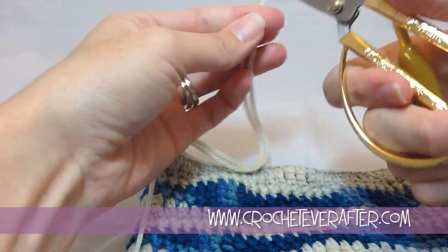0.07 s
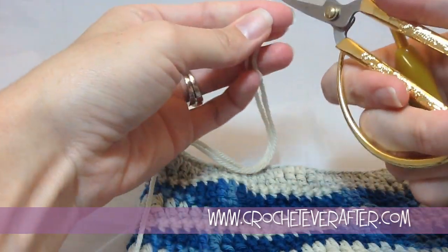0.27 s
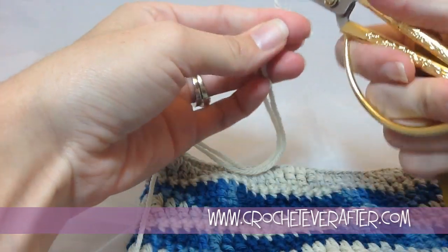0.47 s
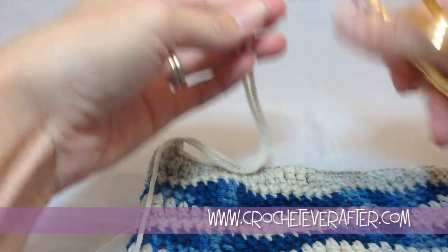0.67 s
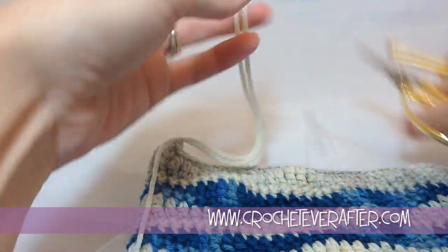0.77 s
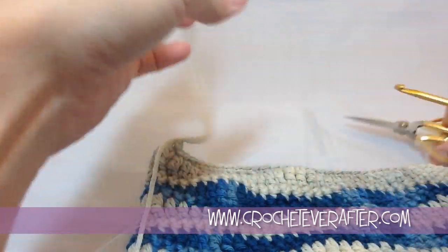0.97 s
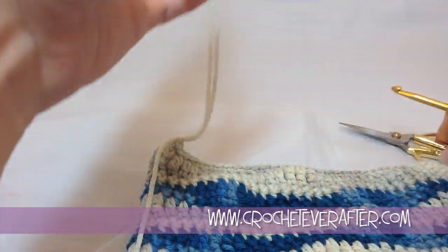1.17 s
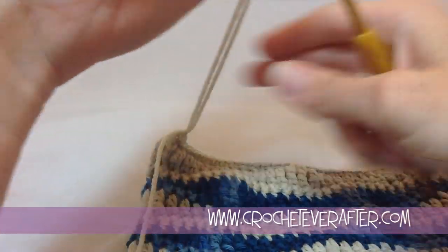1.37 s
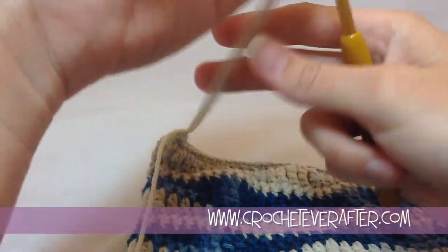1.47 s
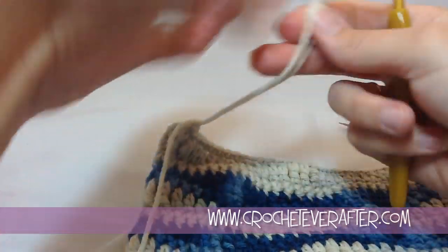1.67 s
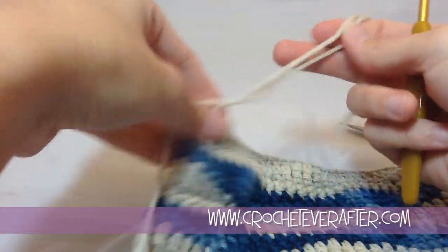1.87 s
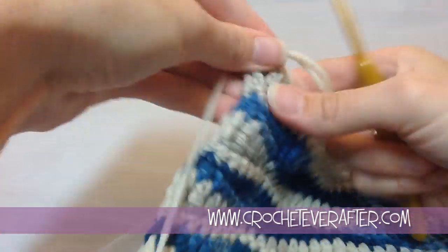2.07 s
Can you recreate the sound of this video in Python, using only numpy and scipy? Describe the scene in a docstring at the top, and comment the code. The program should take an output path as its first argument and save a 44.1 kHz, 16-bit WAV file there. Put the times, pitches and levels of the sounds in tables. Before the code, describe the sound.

Small steel scissors, close to the microphone in a quiet room: a barely audible click at 0.17 seconds, a clear light click at 0.39, a tiny gritty slide, then a bright, sharp snip at 0.47. A soft dull bump comes at 0.83. Scissors scrape and clatter on a hollow table at 1.0-1.2. Yarn slides faintly around 1.5 and from 1.85 to the end, over low room tone.

```python
"""Scissors snip, table knocks and yarn

Small steel scissors close near the microphone: light ringing clicks, a gritty slide of the edges, a sharp snip.
A soft bump; then the scissors drag over a hollow table and knock on it, ringing its modes with noisy clatter.
Yarn slides through fingers as dense tiny ticks, the hand rustles faintly, and a small room answers with echoes.
Coloured noise makes the low room tone and its faint hiss."""
import sys
import numpy as np
from scipy import signal
from scipy.fft import rfft, irfft
from scipy.io import wavfile

SR = 44100
rng = np.random.default_rng(int(sys.argv[2]) if len(sys.argv) > 2 else 0)


def master_out(mix):
    """Clip the mix to full scale and print it as 16-bit PCM to the path in sys.argv[1]."""
    frames = np.transpose(np.atleast_2d(mix))
    ceiling = np.clip(frames, -1, 1)
    pcm = np.round(ceiling * 32767).astype(np.int16)
    wavfile.write(sys.argv[1], SR, pcm)


def gain_from_db(level_db):
    """Turn a decibel level (scalar or array-like) into a linear amplitude factor."""
    decades = np.asarray(level_db, float) / 20
    return 10 ** decades


N = 93492

# Broad resonances of the damped blades. Each row: frequency in Hz, relative level in dB.
BLADE_MODES = [(5300, -8), (6600, -14), (7876, -27), (9400, -13), (9900, -3), (11000, 4), (11700, -15),
               (12830, -12), (13720, 14), (14440, -18)]
# Blade clicks, the last one the snip. Each row: start in seconds, crack level in dB, ring level in dB,
# tilt of the ring in dB per octave, crack tail in dB against its quick part.
BLADE_CLICKS = [(0.171, -57.5, -80, 0, -6), (.3888, -27.5, -51, -2, -10), (0.4724, -14, -31.5, 11, -7)]
# Crack colour of a light click. Each row: frequency in Hz, relative level in dB.
CLICK_COLOUR = [(880, -61.5), (1500, -39), (2120, -13), (2720, -21), (4690, -26), (6430, 2), (7540, -25.5),
                (8830, -9), (10100, -6.5), (14100, -5), (16000, -61)]
# Crack colour of the snip. Each row: frequency in Hz, relative level in dB.
SNIP_COLOUR = [(470, -61), (800, -34), (2250, -26.5), (3170, -15.5), (3500, -23.5), (3920, -12),
               (5660, -12.5), (6500, -16.5), (9730, -5.5), (12200, -16), (14600, -2.5), (16300, -32)]
# Edges sliding on each other. Each row: time in seconds, level in dB.
SLIDE_LEVEL = [(.438, -80), (.443, -58), (.448, -62), (.453, -54), (.46, -45), (.463, -49), (.466, -60),
               (.4715, -52), (.473, -120)]
# Rasp of the slide, lent to the hand's rustle too. Each row: frequency in Hz, relative level in dB.
RASP_COLOUR = [(1180, -62), (2000, -19), (3250, -2.5), (4630, -24), (6650, 6), (7220, -7), (7710, -9),
               (11400, 2), (14300, -3)]


def blades():
    """Steel clicks as noisy cracks over short rings; the slide is coloured grit."""
    t60_s = 0.006
    steel = [(hz, db, t60_s) for hz, db in BLADE_MODES]
    cracks = [(CLICK_COLOUR, 14400), (CLICK_COLOUR, 15300), (SNIP_COLOUR, 16500)]  # colour, top edge in Hz
    out = np.zeros(N)
    for (start, crack_db, ring_db, tilt, tail_db), (tone, top_hz) in zip(BLADE_CLICKS, cracks):
        out += crack(start, crack_db, tone, 0.00096, 0.0051, tail_db, top_hz)
        out += blow(start, ring_db, tilt, steel)
    slide = colour(grit(6700, 1.5), RASP_COLOUR, top_hz=14400)
    return out + curve(SLIDE_LEVEL) * slide


# Modes of the table top. Each row: frequency in Hz, relative level in dB, 60 dB decay time in seconds.
TABLE_MODES = [(115.7, -26, 0.38), (228, 4, 0.11), (336.2, -12.5, 0.31), (371.6, -4, 0.13),
               (392.7, -1.5, 0.2), (513, -4, 0.087), (612.4, -2.5, 0.12), (829, -4, 0.046),
               (965, -12, 0.15), (1091, -4, 0.076), (1532, -0.5, 0.039), (1954, -10.5, 0.14),
               (2008, -4.5, 0.035), (2580, -41, .03)]
# Knocks of the scissors on the table. Each row: start in seconds, ring level in dB, tilt in dB per octave,
# boost of the modes around 1 kHz in dB, clatter level in dB, blade jangle level in dB.
TABLE_KNOCKS = [(1.0474, -22.5, 2, -25, -30.5, -48), (1.091, -19.5, 2, 2, -18, -32),
                (1.109, -26, 0, 7.5, -23, -45), (1.144, -26.5, 2.5, -0.5, -24, -46.5),
                (1.173, -38.5, -1, -9, -67, -74)]
# The many small modes of table and handles. Each row: frequency in Hz, relative level in dB.
CLATTER_COLOUR = [(180, -15), (300, -8.5), (385, -14), (536, -21.5), (611, 2), (707, -11), (850, -6),
                  (1110, -10.5), (1370, -17), (1980, -13), (2340, -14.5), (7000, -40), (9100, -76),
                  (15400, -120)]
# Jangle of the loose blades. Each row: frequency in Hz, relative level in dB.
JANGLE_COLOUR = [(2940, -27), (5000, -21), (6830, -7), (7290, -10), (8330, 5), (11100, -9), (14300, -2),
                 (15000, -11)]
# Scissors dragged over the table. Each row: time in seconds, table rumble in dB, scrape hiss in dB.
DRAG_LEVEL = [(.885, -87, -70.5), (.897, -80, -63), (.93, -70, -63.5), (.96, -98, -61.5),
              (.975, -54.5, -60), (.997, -46.5, -54.5), (1.015, -37.5, -57), (1.035, -66, -59),
              (1.09, -60.5, -56), (1.16, -57, -63), (1.19, -120, -120)]
# Hiss of the scrape. Each row: frequency in Hz, relative level in dB.
SCRAPE_COLOUR = [(880, -25), (1500, -6), (1660, -11), (1950, -7), (2260, -14), (4000, -8.5), (4650, -7),
                 (14000, -13.5)]


def table():
    """Knocks ring the top, clatter and jangle the blades; the drag rubs it; no deep bass is radiated."""
    out = np.zeros(N)
    for start, ring_db, tilt, mid_db, clatter_db, jangle_db in TABLE_KNOCKS:
        out += blow(start, ring_db, tilt, TABLE_MODES, mid_db)
        out += crack(start, jangle_db, JANGLE_COLOUR, 0.0034, 0.025, -12.5)
        out += crack(start, clatter_db, CLATTER_COLOUR, 0.0069, 0.022, -5)
    rumble = rub(TABLE_MODES, grit(3300, 2.7))
    hiss = colour(grit(9000, 3.2), SCRAPE_COLOUR, top_hz=14400)
    out += curve(DRAG_LEVEL) * rumble + curve(DRAG_LEVEL, col=2) * hiss
    return signal.sosfilt(signal.butter(4, 105, "high", fs=SR, output="sos"), out)


# Small tick in the bump. Each row: frequency in Hz, relative level in dB.
BUMP_TICK_COLOUR = [(300, -20), (1000, -2), (1500, 14.5), (2100, -7), (3500, 2.5), (5500, -11), (8000, -38)]


def bump():
    """A soft push: a pressure dip and rebound, a small tick, a low thud and a dull ring of the table."""
    start_s, half_push_s = 0.8344, 0.00067
    t = since(start_s)
    u = np.clip(t / half_push_s, 0, 2)
    push = -gain_from_db(-28) * np.sin(np.pi * u) * np.exp(-0.3 * u)
    thud = gain_from_db(-40.5) * np.sin(2 * np.pi * 290 * t) * np.exp(-t / 0.015)
    thud += gain_from_db(-47) * np.sin(2 * np.pi * 130 * t) * t / 0.0089 * np.exp(-t / 0.013)
    dull_ring = blow(start_s, -57.5, -9, TABLE_MODES)
    tick = crack(start_s, -41.5, BUMP_TICK_COLOUR, 0.001, 0.0071, -5.5)
    return push + thud + dull_ring + tick


# Yarn through the fingers. Each row: time in seconds, level in dB.
YARN_LEVEL = [(1.41, -70), (1.456, -58), (1.494, -55), (1.524, -62.5), (1.53, -94), (1.784, -76),
              (1.89, -54), (1.988, -57.5), (2.032, -65.5), (2.06, -55.5), (2.072, -61.5), (2.092, -56),
              (2.12, -56.5)]
# Colour of the fibres. Each row: frequency in Hz, relative level in dB.
FIBRE_COLOUR = [(710, -31), (1200, -0.5), (1490, -9), (1760, -2), (1910, -3), (2900, 5), (3680, -1),
                (5380, 1.5), (7950, -5), (14000, -10)]


def yarn():
    """Yarn sliding through the fingers as dense tiny ticks in the colour of its fibres."""
    return curve(YARN_LEVEL) * colour(grit(7000, -1), FIBRE_COLOUR, top_hz=14400)


# Faint rustle of the hand in the treble. Each row: time in seconds, level in dB.
RUSTLE_LEVEL = [(1.64, -89), (1.685, -63), (1.705, -77), (1.72, -120)]


def rustle():
    """The brushing hand as faint gritty treble."""
    return curve(RUSTLE_LEVEL) * colour(grit(9000, 1.4), RASP_COLOUR, top_hz=14400)


# First echoes off table and wall. Each row: delay in seconds, relative level in dB.
FIRST_ECHOES = [(.002, -9.5), (.0055, -14.5), (0.012, -14.5)]


def room(x):
    """Smeared first echoes, then the diffuse tail of a small furnished room; the treble dies first."""
    tail_db, treble_db = -13, -3.5
    low_t60_s, high_t60_s, gap_s, smear_s = 0.32, 0.17, 0.0051, 0.00042
    t = np.arange(SR // 2) / SR
    noise, echo_noise = rng.standard_normal((2, len(t)))
    low = signal.sosfilt(signal.butter(2, 3500, fs=SR, output="sos"), noise)
    high = gain_from_db(treble_db) * (noise - low)
    tail = low * np.exp(-np.log(1000) * t / low_t60_s) + high * np.exp(-np.log(1000) * t / high_t60_s)
    tail *= t > gap_s
    tail *= gain_from_db(tail_db) / np.sqrt(np.sum(tail ** 2))
    bumps = sum(gain_from_db(db) * np.exp(-((t - delay) / smear_s) ** 2) for delay, db in FIRST_ECHOES)
    first = bumps * echo_noise / 5
    echo = signal.fftconvolve(x, tail + first)[:N]
    return signal.sosfilt(signal.ellip(6, 0.5, 60, 15200, fs=SR, output="sos"), echo)


# Level of the room tone. Each row: time in seconds, level in dB.
AIR_LEVEL = [(0, -56), (.5, -55.5), (.9, -55.5), (1.3, -52), (1.7, -53.5), (2.12, -52.5)]
# Colour of the room tone and hiss. Each row: frequency in Hz, relative level in dB.
AIR_COLOUR = [(24, -70), (40, -24), (116, -20.5), (219, -1.5), (356, -12), (383, -2.5), (412, -15),
              (538, -11), (670, -20), (854, -18), (1040, -26.5), (1730, -28.5), (2370, -31.5),
              (13300, -34.5)]


def air():
    """Room tone and hiss: noise under a slow level curve, heaviest in the lows."""
    return curve(AIR_LEVEL) * colour(rng.standard_normal(N), AIR_COLOUR, top_hz=13550)


def since(start):
    """Seconds since a start, zero before it."""
    return np.clip(np.arange(N) / SR - start, 0, 3)


def curve(rows, col=1):
    """A dB column over time as gain; near silence before the first row, the last level held after."""
    r = np.array(rows)
    return gain_from_db(np.interp(np.arange(N) / SR, r[:, 0], r[:, col], -140, r[-1, col]))


def colour(x, points, top_hz=16500):
    """Shape a sound by (Hz, dB) points up to a top edge; rms 1."""
    hz, db = np.array(points).T
    f = np.arange(1, N // 2 + 2) * SR / N
    gain = gain_from_db(np.interp(np.log(f), np.log(hz), db)) * (f < top_hz)
    y = irfft(rfft(x) * gain, N)
    return y / np.std(y)


def blow(start, db, tilt, modes, mid_db=0):
    """A blow rings the modes, each swelling within about a cycle; each blow meets them at another place."""
    swell_cycles, scatter_db = 0.43, 2
    t = since(start)
    hz, peak_db, t60 = np.array(modes).T[:, :, None]
    phase, scatter = rng.standard_normal((2, len(modes), 1))  # phase in cycles
    tone_db = tilt * np.log2(hz / np.median(hz)) + mid_db * ((hz > 750) & (hz < 1300))
    gain = gain_from_db(peak_db + tone_db + scatter_db * scatter)
    shape = (1 - np.exp(-t * hz / swell_cycles)) * np.exp(-np.log(1000) * t / t60)
    return gain_from_db(db) * np.sum(gain * shape * np.sin(2 * np.pi * (hz * t + phase)), axis=0)


def crack(start, db, points, fast_s, slow_s, slow_db, top_hz=15300):
    """Coloured noise, more modes than can be told apart: steep start, quick fall, slower tail."""
    rise_s = 0.00044
    t = since(start)
    fall = np.exp(-t / fast_s) + gain_from_db(slow_db) * np.exp(-t / slow_s)
    fade = (1 - np.exp(-(t / rise_s) ** 2)) * fall
    return gain_from_db(db) * fade * colour(rng.standard_normal(N), points, top_hz)


def grit(per_s, spread_db):
    """Dense random ticks of uneven size; rms 1."""
    size = rng.standard_normal(N)
    hits = rng.random(N) < per_s / SR
    x = size * hits * gain_from_db(spread_db * rng.exponential(1, N))
    return x / np.std(x)


def rub(modes, force):
    """A rubbing force rings each damped mode of a body; rms 1."""
    y = np.zeros(N)
    for hz, db, t60 in modes:
        pole = np.exp(2j * np.pi * hz / SR - np.log(1000) / (t60 * SR))
        y += gain_from_db(db) * signal.lfilter([1], [1, -pole], force).imag
    return y / np.std(y)


def scene():
    """Near sources with their echoes over the room tone."""
    near = blades() + table() + bump() + yarn() + rustle()
    return (near + room(near) + air())[None]


def low_pass(x):
    """Removes everything above the highest recorded frequency."""
    return signal.sosfilt(signal.butter(12, 16480, fs=SR, output="sos"), x)


def record(dry):
    """The microphone loses the deep bass."""
    mix = signal.sosfilt(signal.butter(2, 70, "high", fs=SR, output="sos"), dry)
    return low_pass(mix)


dry = scene()
out = record(dry)
master_out(out)
```